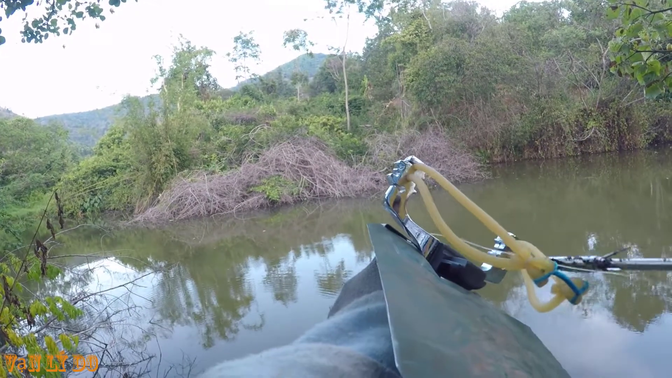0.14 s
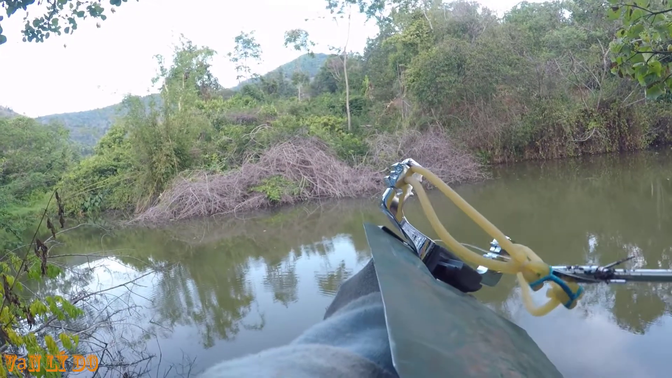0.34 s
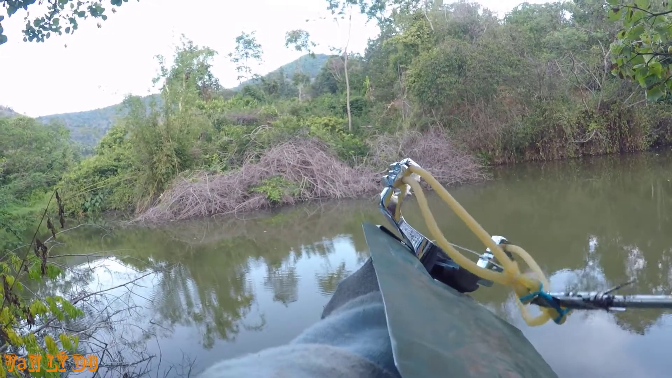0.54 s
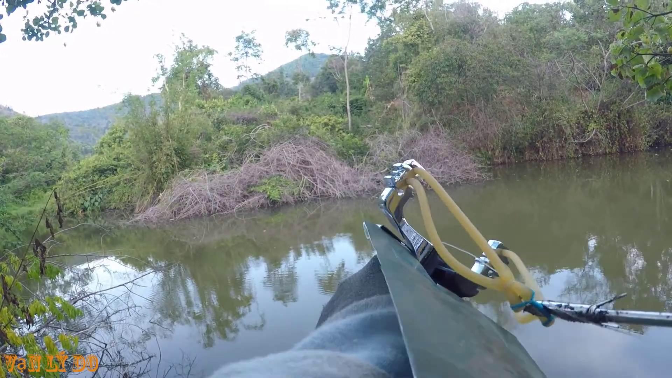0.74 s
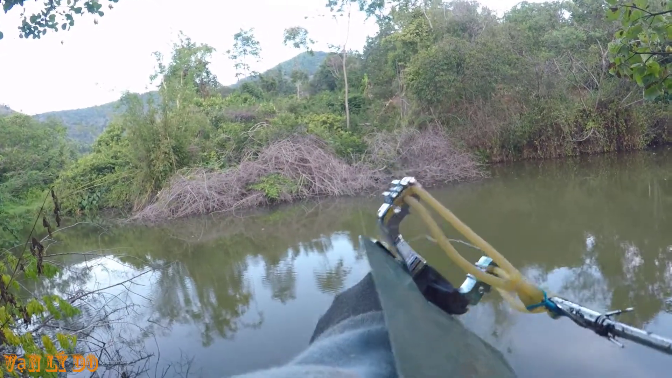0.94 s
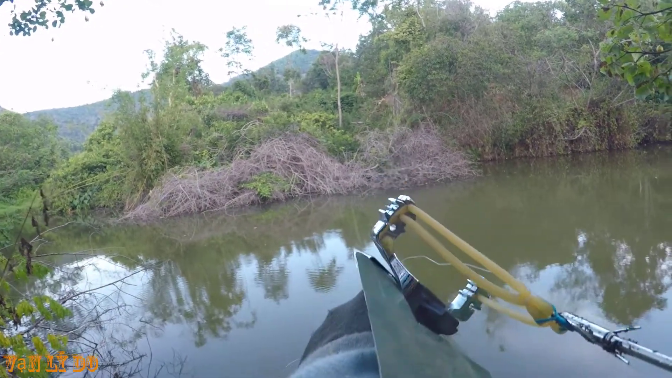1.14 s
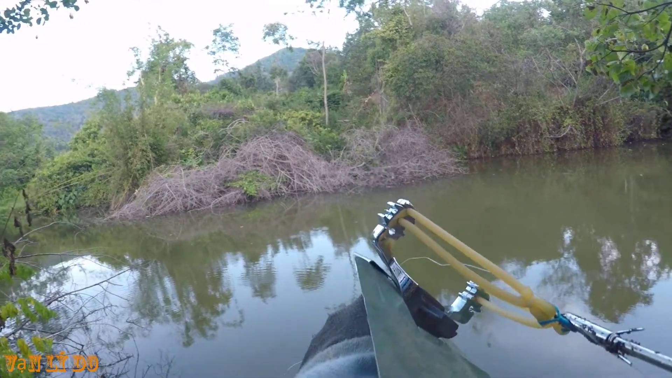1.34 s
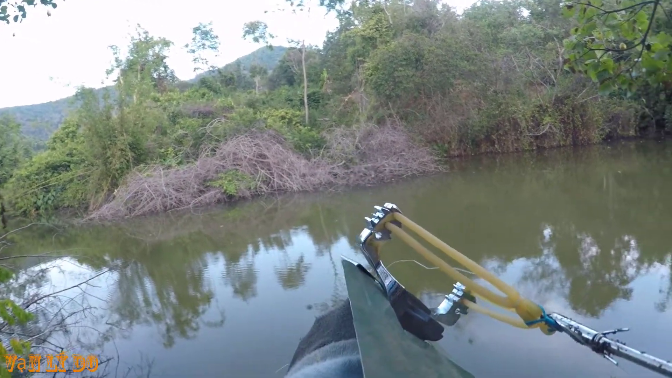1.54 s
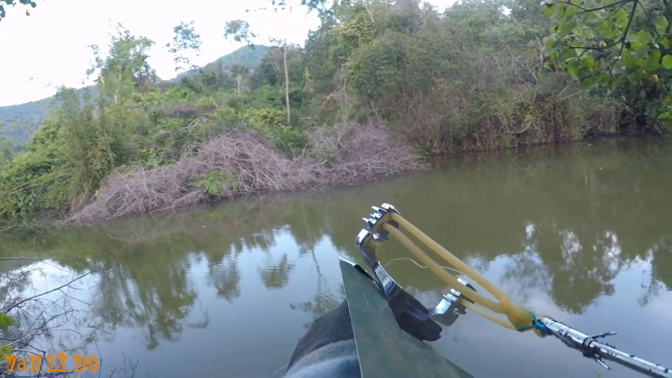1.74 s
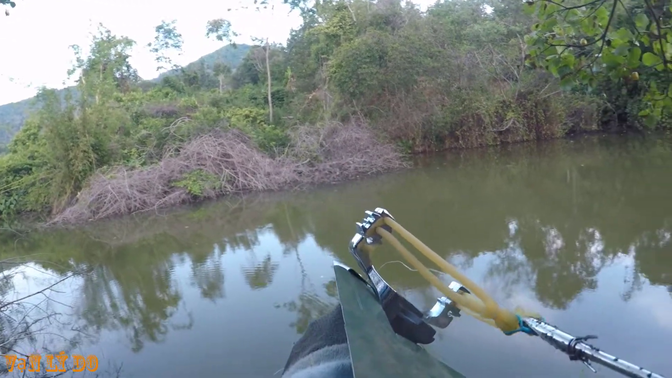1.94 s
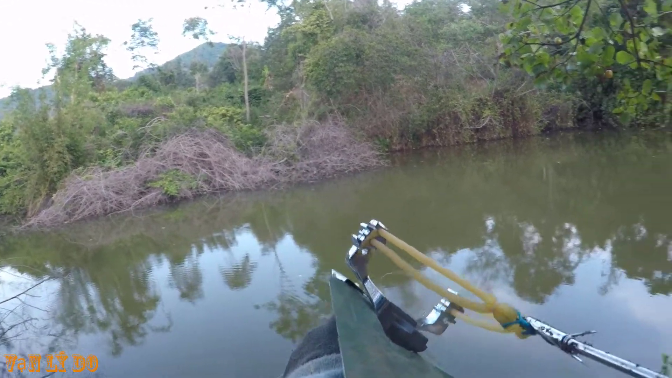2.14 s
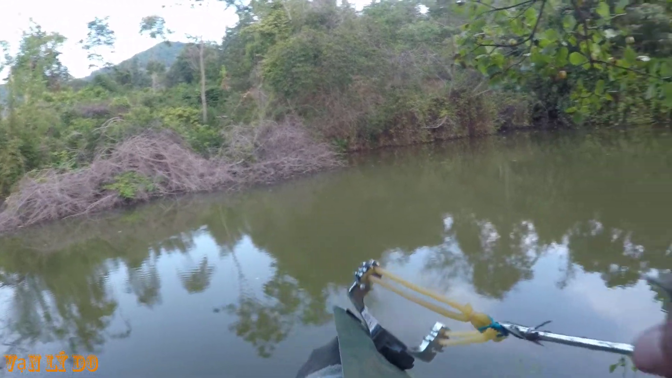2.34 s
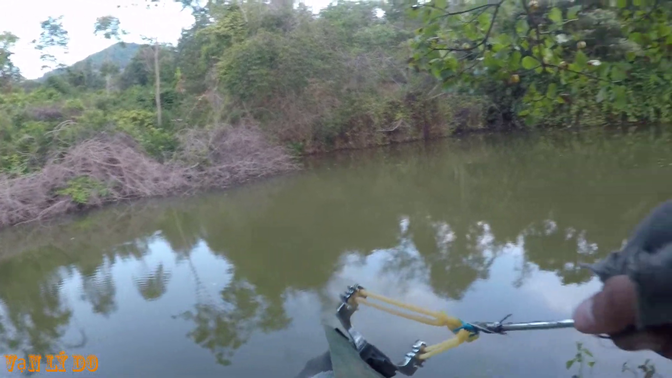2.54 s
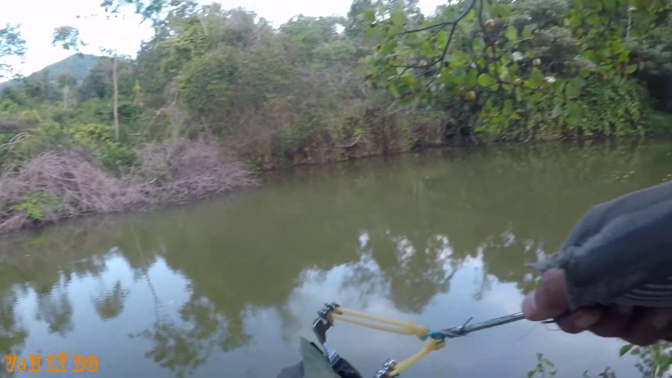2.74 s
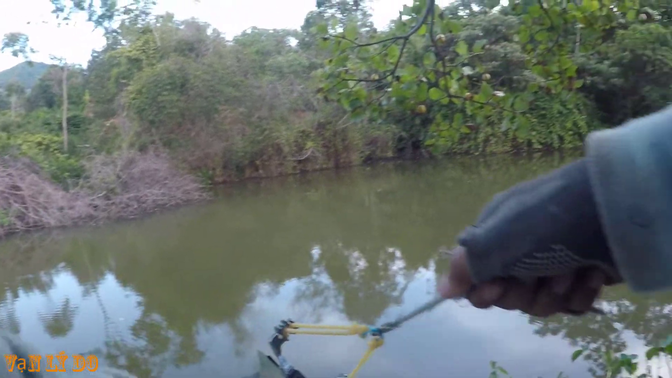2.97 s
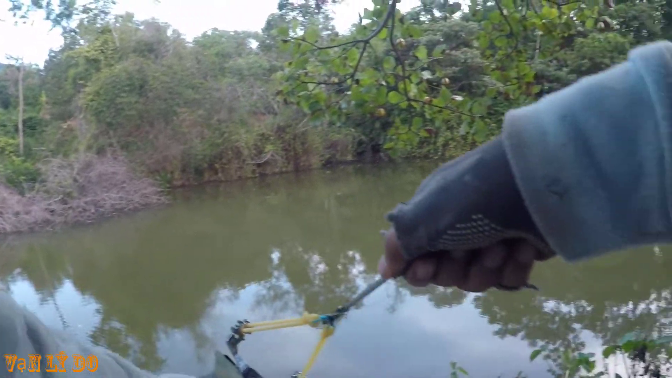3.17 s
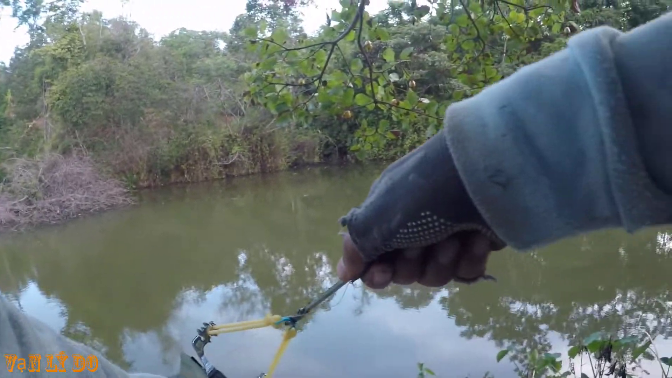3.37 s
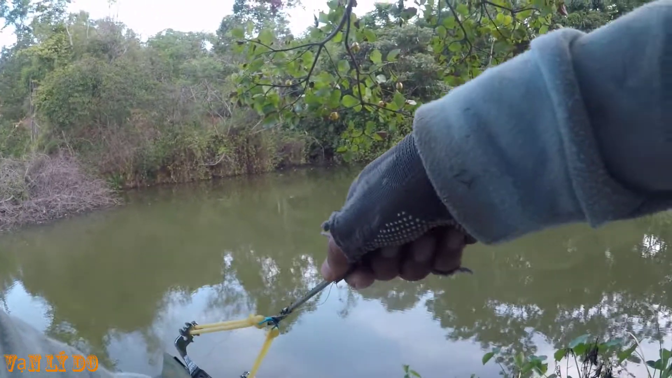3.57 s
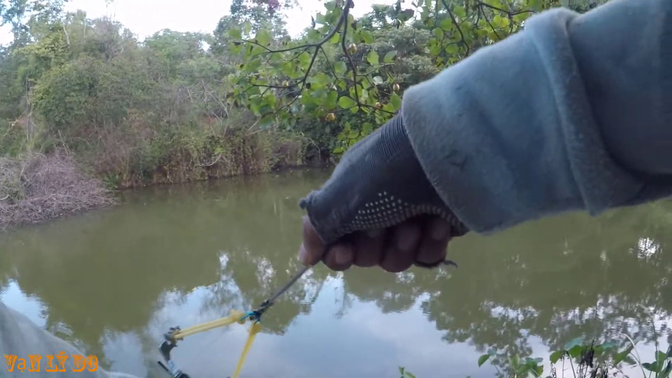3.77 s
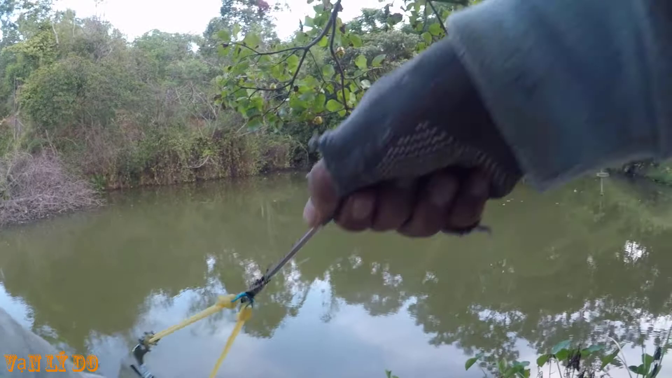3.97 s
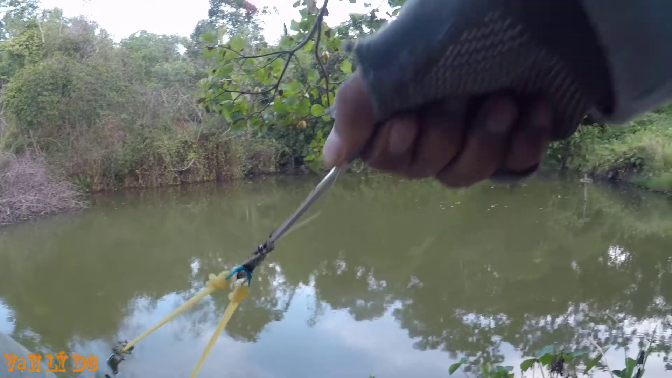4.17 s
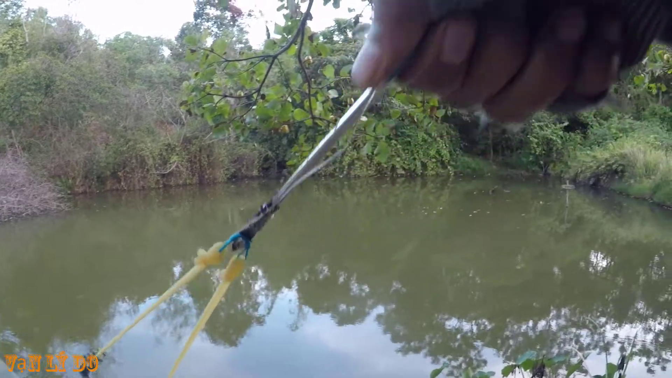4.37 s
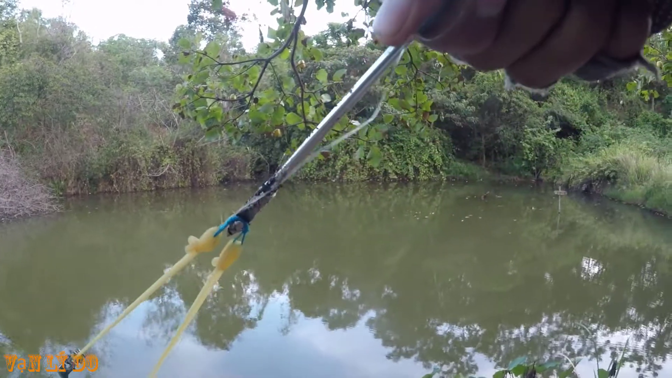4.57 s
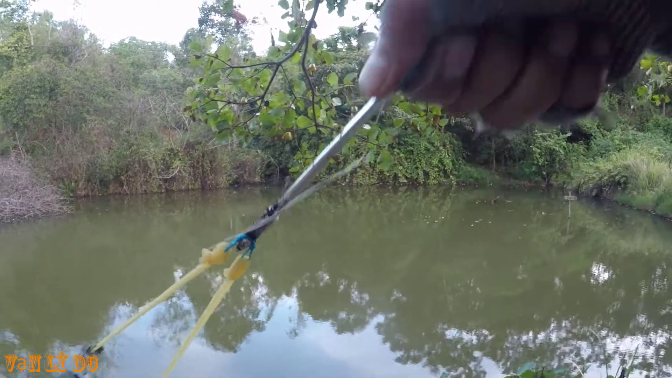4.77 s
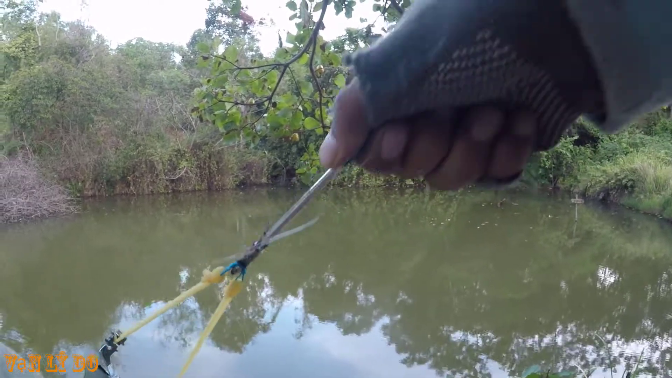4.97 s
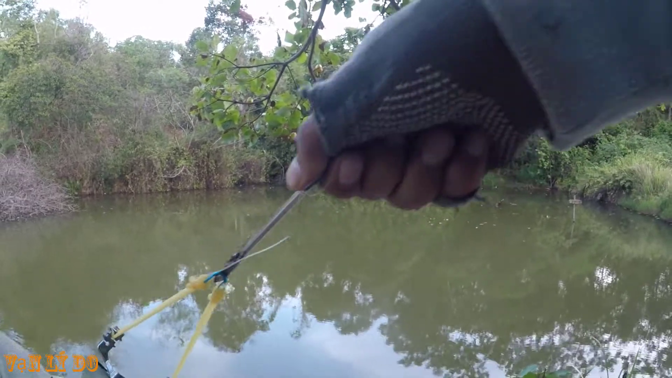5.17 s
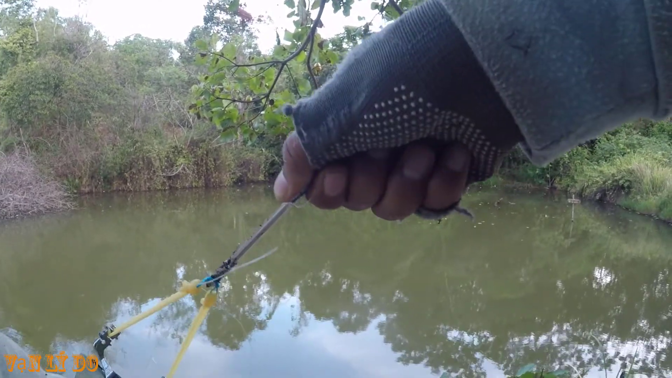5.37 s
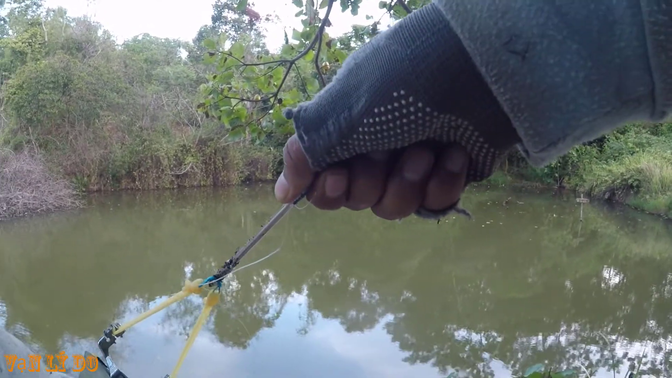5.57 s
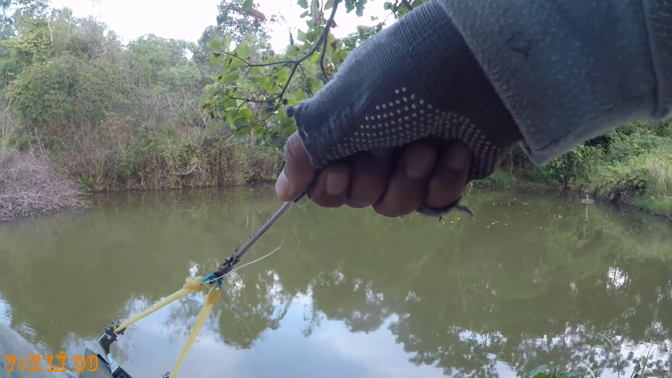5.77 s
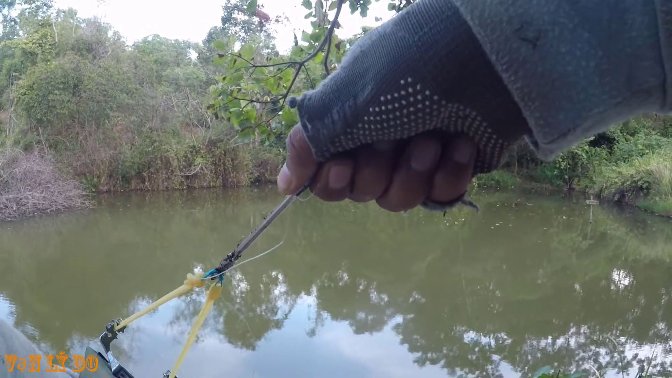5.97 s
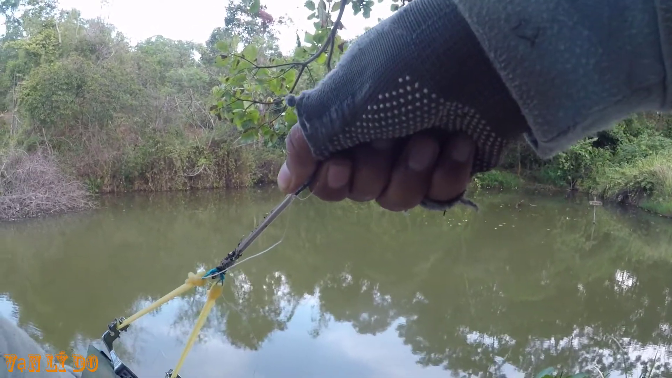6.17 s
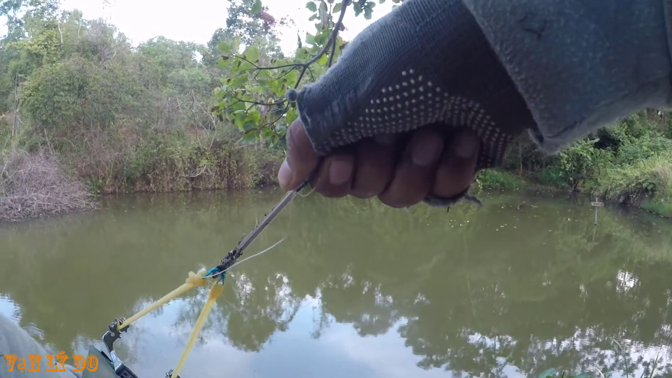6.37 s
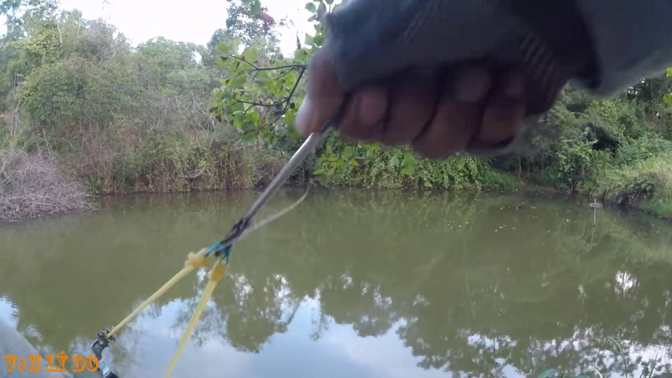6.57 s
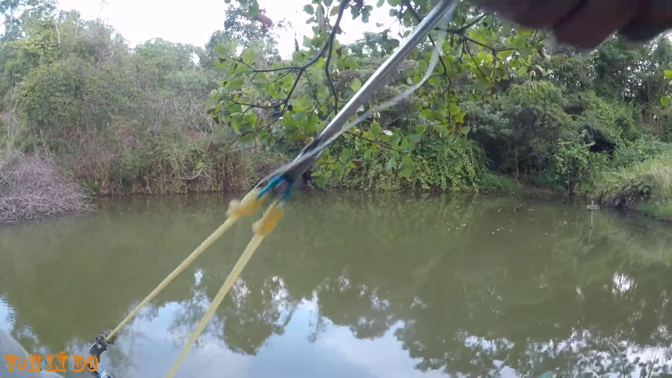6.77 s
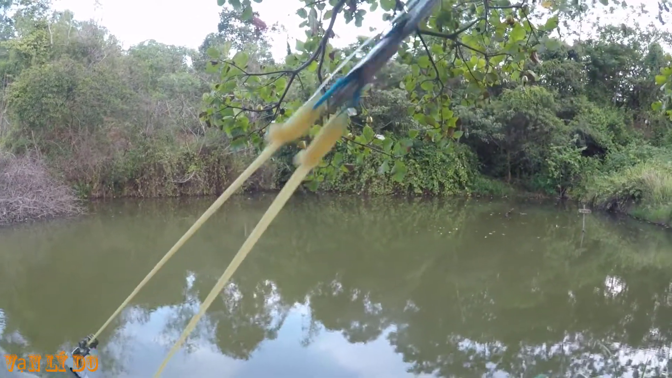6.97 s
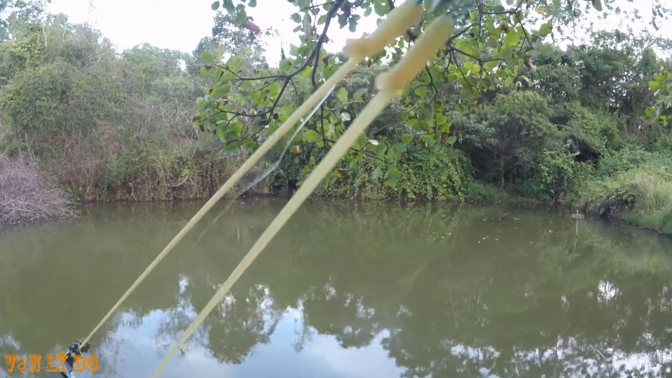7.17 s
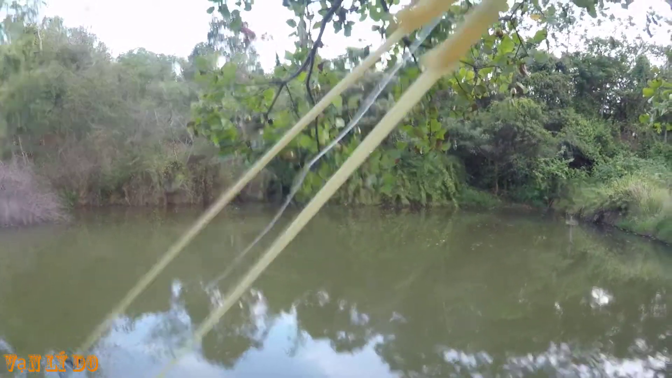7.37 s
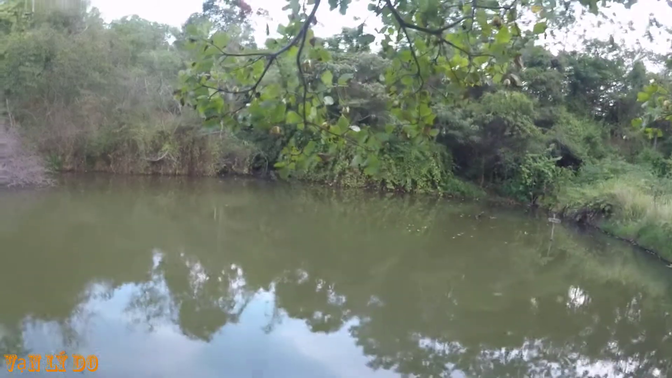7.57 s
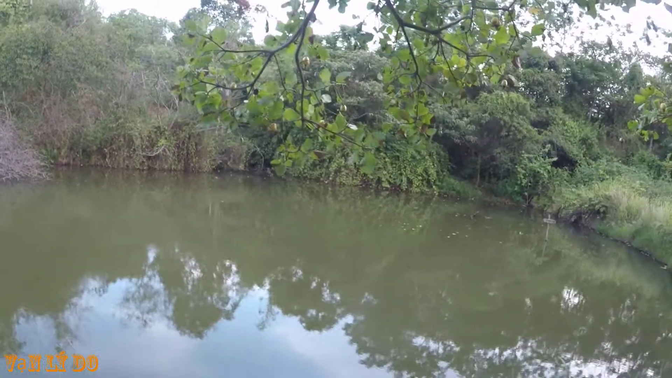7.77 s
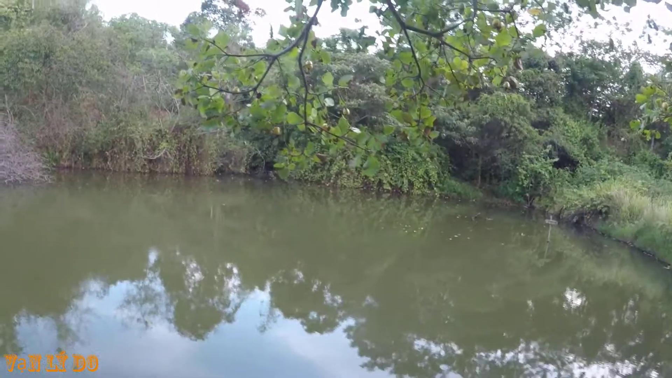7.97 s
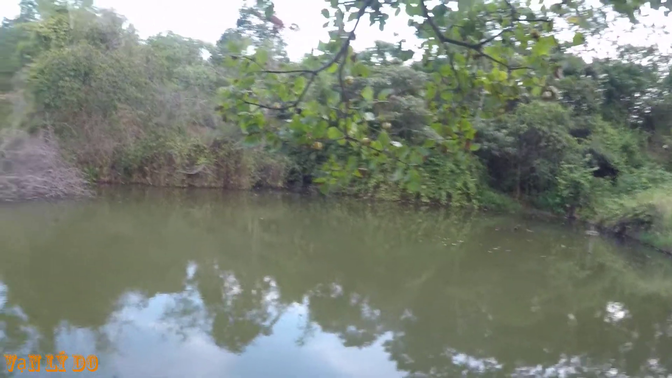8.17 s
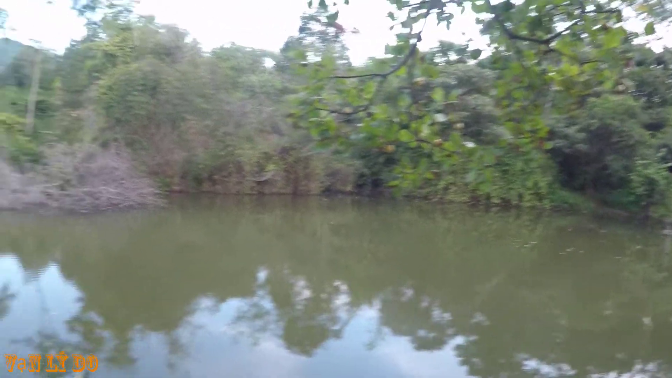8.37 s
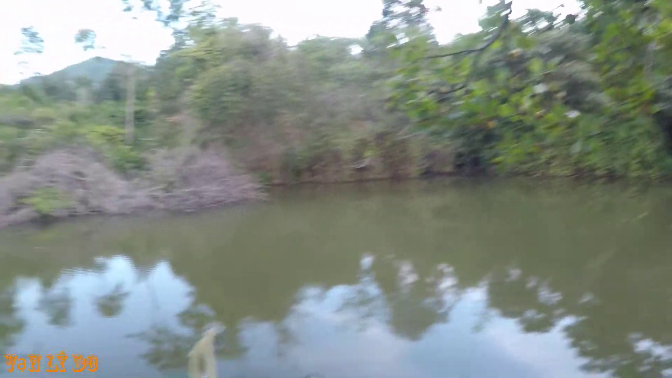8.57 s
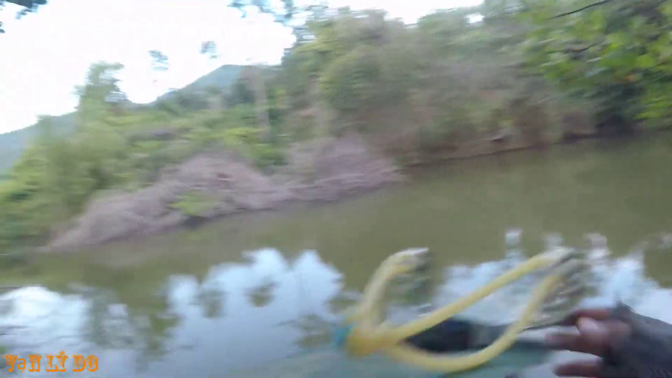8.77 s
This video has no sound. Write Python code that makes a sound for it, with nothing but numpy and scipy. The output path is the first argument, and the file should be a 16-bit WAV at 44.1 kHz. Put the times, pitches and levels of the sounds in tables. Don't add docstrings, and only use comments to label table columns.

```python
import sys
import numpy as np
from scipy import signal
from scipy.fft import rfft, irfft
from scipy.io import wavfile

SR = 44100
rng = np.random.default_rng(int(sys.argv[2]) if len(sys.argv) > 2 else 0)


def generate_wav(signal):
    frames = np.transpose(np.atleast_2d(signal))
    scaled = np.clip(frames, -1, 1) * 32767
    pcm = np.round(scaled).astype(np.int16)
    wavfile.write(sys.argv[1], SR, pcm)


def linear_from_db(decibels):
    return 10 ** (np.asarray(decibels, float) / 20)


N = 388521

# (frequency [Hz], level per Hz [dB])
RUMBLE_SPECTRUM = [(90, -45), (110, -42), (138, -4.5), (161, 0), (300, -7.5), (400, -13), (625, -16),
                   (960, -20.5), (1600, -24), (2400, -28.5), (3000, -35), (3500, -37), (4500, -35.5)]
# (time [s], gain on the rumble [dB])
SLEEVE_STIR = [
    (1.85, -1.5),
    (2.1, 1),
    (3.1, 0.3),
    (3.6, -0.5),
]
# (frequency [Hz], level per Hz [dB])
LEAF_SPECTRUM = [(2500, -54), (3600, -18), (4600, -3.5), (5500, -2), (6700, 2.5), (7800, -2), (9500, 2.5),
                 (11000, -4.5), (12400, -7.5), (14700, -11.5), (15800, -33)]
# (frequency [Hz], level per Hz [dB])
WIND_SPECTRUM = [(10, -5.5), (20, 5), (40, 0), (74, -1), (117, -7), (200, -18.5), (400, -22), (800, -33)]
# (time [s], level [dB])
BREEZE = [(0, -21.5), (.2, -29.5), (.86, -22.5), (1.4, -26), (2.11, -31.5), (2.5, -25), (2.7, -29.5),
          (3.3, -27), (3.45, -21.5), (3.8, -21), (4.3, -20), (5.05, -22), (5.2, -25.5), (5.72, -32),
          (6.43, -37), (6.94, -48), (7.3, -23.5), (8.81, -24)]
# (time [s], level [dB])
BODY_MOTION = [(7.25, -61), (7.41, -14), (7.63, -18), (7.75, -18.5), (8.4, -17), (8.51, -13.5), (8.56, -22),
               (8.66, -11.5), (8.81, -19)]
# (time [s], cricket gain [dB])
BODY_TURN = [(0, 0.5), (1.3, -0.5), (1.9, -3.5), (2.55, -6), (3.0, -11), (3.6, -8), (4.05, -12.5),
             (4.6, -11.5), (5.15, -12.5), (5.85, -8.5), (6.4, -13), (7.1, -15.5), (7.75, -10), (8.2, -8),
             (8.81, -4.5)]
# (time [s], upper pitch [Hz], lower pitch [Hz], upper louder by [dB])
NEAR_SONG = [(0, 5136, 5060, -3), (.45, 5204, 5090, 3), (.8, 5177, 5035, -2), (1.3, 5196, 5104, -4),
             (1.75, 5140, 5030, -1), (2.1, 5150, 4920, -1), (2.6, 5174, 5060, 3), (3.1, 5190, 5070, -1),
             (3.55, 5260, 5100, -5), (3.9, 5210, 5140, 2), (4.3, 5100, 5010, -8), (5.0, 5180, 5110, -8),
             (5.3, 5090, 4965, -3), (5.95, 5155, 5075, 1), (6.75, 5250, 5160, -6), (7.4, 5150, 5010, -2),
             (8.0, 5165, 5050, 1), (8.6, 5120, 4970, 1)]
# (start [s], end [s], start pitch [Hz], end pitch [Hz], level [dB])
FAR_PHRASES = [
    (0.25, 0.651, 4930, 4930, -43),
    (1.25, 1.648, 4900, 5000, -40),
    (1.905, 2.256, 4910, 4830, -45),
    (2.284, 2.75, 4900, 5030, -43),
    (3.041, 3.993, 4870, 5140, -46),
    (4.097, 5.099, 4910, 5030, -43.5),
    (5.1, 6.096, 4900, 5040, -44),
    (6.1, 6.597, 4980, 4920, -45.5),
    (7.05, 7.401, 4950, 4920, -49),
    (8.401, 8.81, 4900, 4950, -45),
]
# (time [s], peak level [dB], lowest [Hz], highest [Hz])
TICKS = [(2.21, -20, 800, 4500), (2.397, -20, 1490, 2600), (2.936, -22, 1400, 4500),
         (2.937, -24, 5300, 5900), (2.987, -22, 1400, 2967), (7.311, -23, 1510, 6500),
         (8.644, -21.5, 1200, 6500), (8.668, -20.5, 1200, 6500), (7.41, 0, 1500, 13980),
         (7.4385, -10, 1000, 12000), (7.503, -5, 800, 11000), (7.626, -7, 5000, 5940),
         (7.623, -14, 600, 4000), (7.628, -14, 1520, 12100), (7.689, -13, 500, 2200),
         (7.697, -20, 1500, 9000), (7.81, -23, 3530, 7000), (7.91, -27, 3800, 5000),
         (7.965, -31, 3770, 4780), (8.078, -20, 6970, 8260), (8.078, -23, 3000, 6000),
         (8.242, -34, 3500, 6000), (8.296, -36, 3500, 5900), (8.36, -22, 3600, 5100),
         (8.406, -20, 500, 2600), (8.454, -36, 3470, 6000), (8.723, -19, 1200, 2400),
         (8.485, -10.5, 1200, 9000), (8.776, -10.5, 1000, 7600)]
# (time [s], peak level [dB], pitch [Hz])
HAND_BUMPS = [(.748, -10, 248.4), (0.846, -16, 149), (1.2379, -7.5, 250), (1.659, -19, 178.4),
              (2.176, -7, 175), (2.197, -12.5, 177), (2.349, -20, 181.3), (3.373, -15, 300),
              (3.48, -20, 218), (3.98, -10, 191.8), (5.893, -16.5, 220.7), (7.092, -14, 198),
              (7.382, -7, 173), (7.5025, 5, 196), (7.57, -8, 162), (7.684, -3.5, 199), (7.688, -14.5, 550),
              (7.694, -19, 109.6), (8.385, -8, 203), (8.408, -10.5, 120.6), (8.481, 1, 421),
              (8.4858, 2.5, 250), (8.487, -7, 600), (8.641, -13, 111)]
# (time [s], peak level [dB], pitch [Hz])
ARM_THUMPS = [
    (8.497, 3, 72),
    (8.668, -4, 90),
    (8.721, 0.5, 75),
]
# (time [s], peak level [dB], pitch [Hz], t60 [s], direction [+1 or -1])
ARM_JOLTS = [
    (7.401, 6.5, 39, .05, 1),
    (7.427, 1, 34, 0.18, -1),
    (7.466, -1.5, 16, 0.57, 1),
    (7.52, 2.5, 15.7, 0.46, -1),
    (8.476, 9.5, 51, 0.071, -1),
]
# (time [s], low ring [dB], low ring pitch [Hz], high rings [dB], pitch struck best [Hz])
FRAME_KNOCKS = [
    (7.4145, 7, 870, -9, 5300),
    (7.4385, -1, 980, -5, 5850),
    (7.446, -2, 1000, -14, 4390),
    (7.4545, 0, 2050, -14, 5450),
    (7.462, -1, 1950, -14, 4390),
    (7.5015, -3, 950, -16, 5100),
    (7.623, 2, 900, -10, 5500),
    (8.776, -4, 800, -17, 4800),
    (8.807, -20, 900, -24, 4000),
]
# (pitch [Hz], level [dB], t60 [s])
FRAME_RINGS = [(4390, -1, .022), (5100, -1, .02), (5450, 0, .035), (5850, 0, .02), (6400, 0, .016)]
# (pitch [Hz], width [Hz], level [dB])
FORK_LOW_RINGS = [(849, 138, 10.5), (1030, 120, -13), (1320, 100, 2), (1815, 200, 3), (2030, 180, 4),
                  (2290, 123, -4), (2600, 170, 1.5)]
# (pitch [Hz], width [Hz], level [dB])
FORK_HIGH_RINGS = [(3980, 124, -3.5), (4260, 100, -4), (4500, 210, -5.5), (4660, 130, -7), (5220, 180, -3),
                   (5630, 97, -5), (5900, 120, -4), (6470, 160, -11.5)]
# (time [s], level [dB], t60 [s], low ring [dB])
LINE_RATTLE = [(7.416, -8, 0.12, -12), (7.446, -14.5, 0.17, -1.5), (7.455, -13, 0.13, -7.5),
               (7.464, -17, 0.19, -3), (7.476, -17, 0.27, -2), (7.556, -38, .13, 1), (7.570, -28.5, .1, 6),
               (7.579, -24, 0.087, 0.5), (7.605, -28, .34, -3), (7.685, -28.5, .065, -4),
               (8.626, -30.5, .13, 4.5), (8.638, -33, .08, -3), (8.658, -27, 0.083, -2),
               (8.666, -27, 0.058, 1), (8.69, -33, 0.2, -4), (8.718, -26.5, 0.036, 3)]
# (time [s], level [dB], t60 [s], low ring [dB], bright crack [dB])
BAND_SLAPS = [
    (7.385, -26, .03, 9, -12),
    (7.388, -19, 0.021, 11, -3),
    (7.391, -6.5, 0.0095, -10, 11),
    (7.398, -13, 0.13, -6, -12),
    (7.409, 3, 0.046, -1.5, -14),
    (7.437, -0.5, 0.068, 1, -30),
    (7.4998, -8.5, 0.031, 6.5, -22),
    (7.692, -22, 0.027, 8, -4),
    (8.477, -30, 0.046, 7, -25),
    (8.482, -26, 0.019, 14, -6),
]


def unit(x):
    return x / np.sqrt(np.mean(x ** 2) + 1e-20)


def in_time(rows):
    s, *columns = np.transpose(rows)
    return [np.interp(np.arange(N) / SR, s, column) for column in columns]


def drift(rate):
    r = np.exp(-80 * np.pi * rate / SR)
    noise = rng.standard_normal(N // 40 + 2002)
    slow = signal.lfilter([1], [1, -2 * r, r * r], noise)[2000:]
    return np.interp(np.arange(N) / 40, np.arange(len(slow)), unit(slow))


def coloured(spectrum, patchy_db, rate):
    hz = np.fft.rfftfreq(N + 1, 1 / SR) + 1
    points = np.array(spectrum)
    level_db = np.interp(np.log(hz), np.log(points[:, 0]), points[:, 1], left=-90, right=-90)
    shaped = rfft(rng.standard_normal(N + 1)) * linear_from_db(level_db)
    out, together = 0, drift(rate / 4)
    for octave in range(int(np.log2(points[0, 0])), int(np.log2(points[-1, 0])) + 2):
        share = np.clip(1 - abs(np.log2(hz) - octave), 0, 1)
        flicker = linear_from_db(patchy_db * (0.34 * together + drift(rate)))
        out = out + irfft(shaped * share, N + 1)[:N] * flicker
    return unit(out)


def add_ring(out, s, db, hz, t60, rise=0.):
    i = round(s * SR)
    t = np.arange(min(N - i, int(1.5 * t60 * SR))) / SR
    onset = 1 - np.exp(-t * hz / (rise + 1e-3))
    out[i:i + len(t)] += linear_from_db(db - 60 * t / t60) * np.sin(2 * np.pi * hz * t) * onset


def far_rumble(motion_db):
    keep = np.exp(-1 / (0.087 * SR))
    cloth = signal.lfilter([1 - keep], [1, -keep], linear_from_db(motion_db - 12))
    level = np.hypot(linear_from_db(-26 + in_time(SLEEVE_STIR)[0]), cloth)
    return level * coloured(RUMBLE_SPECTRUM, patchy_db=0.98, rate=6.0)


def leaf_hiss(shade_db):
    return linear_from_db(-38.5 - 0.16 * shade_db) * coloured(LEAF_SPECTRUM, patchy_db=.5, rate=5.7)


def wind(motion_db):
    level = np.hypot(linear_from_db(in_time(BREEZE)[0]), linear_from_db(motion_db))
    return level * coloured(WIND_SPECTRUM, patchy_db=-2.0, rate=6.6)


def chirr(pitch_hz, pulses_hz, depth, blur_hz):
    beat = np.cos(2 * np.pi * np.cumsum(pulses_hz * (1 + 0.0599 * drift(6.78))) / SR)
    phase = 2 * np.pi * np.cumsum(pitch_hz + 8 * drift(2.95)) / SR
    tone = (1.46 + drift(blur_hz)) * np.sin(phase) + drift(blur_hz) * np.cos(phase)
    return unit(tone * (1 + depth * beat))


def far_crickets():
    t = np.arange(N) / SR
    pitch_hz, gate = np.full(N, 5000.), np.zeros(N)
    for start, end, start_hz, end_hz, level_db in FAR_PHRASES:
        on = (t >= start) & (t < end)
        along = (t[on] - start) / (end - start)
        pitch_hz[on] = start_hz + (end_hz - start_hz) * along
        gate[on] = linear_from_db(level_db) * np.minimum(1, 6.0 * np.minimum(along, 1 - along))
    return gate * chirr(pitch_hz, pulses_hz=68.0, depth=0.84, blur_hz=30)


def near_crickets(shade_db):
    upper_hz, lower_hz, lead_db = in_time(NEAR_SONG)
    pair_db = -36.5 + shade_db
    upper = linear_from_db(pair_db + lead_db / 2) * chirr(upper_hz, pulses_hz=75, depth=0.28, blur_hz=30.6)
    lower = linear_from_db(pair_db - lead_db / 2) * chirr(lower_hz, pulses_hz=61.6, depth=0.19, blur_hz=30)
    middle_hz = (upper_hz + lower_hz) / 2
    between = linear_from_db(pair_db + 0.5) * chirr(middle_hz, pulses_hz=90, depth=1.0, blur_hz=45)
    return upper + lower + between


def ticks():
    out, t = np.zeros(N), np.arange(256) / SR
    for s, db, low_hz, high_hz in TICKS:
        grit = 0.18 * rng.standard_normal(len(t)) * np.exp(-t / 0.0013)
        contact = (t == 0) + grit
        band = signal.butter(3, [low_hz, high_hz], "band", fs=SR, output="sos")
        burst = signal.sosfilt(band, contact)
        out[round(s * SR):][:len(t)] += linear_from_db(db - 0.5) * burst / abs(burst).max()
    return out


def bumps_and_thumps():
    out = np.zeros(N)
    for table, cycles_to_60_db in (HAND_BUMPS, 8.7), (ARM_THUMPS, 3.2):
        for s, db, hz in table:
            add_ring(out, s, db + 3.5, hz, cycles_to_60_db / hz, rise=0.15)
    return out


def arm_jolts():
    push, pull = np.zeros(N), np.zeros(N)
    for s, db, hz, t60, direction in ARM_JOLTS:
        add_ring(push if direction > 0 else pull, s, db, hz, t60, rise=0.12)
    return push - pull


def frame_knocks():
    out = np.zeros(N)
    for s, low_db, low_hz, high_db, best_hz in FRAME_KNOCKS:
        contact_s = .0018 * linear_from_db(low_db)
        add_ring(out, s - .001, low_db + 6, low_hz, .021, rise=.5 + 900 * contact_s)
        for hz, db, t60 in FRAME_RINGS:
            off_spot_db = abs(hz - best_hz) / 150
            add_ring(out, s + contact_s, high_db + db - off_spot_db, hz, t60, rise=2.5)
    return out


def ring_fork(clicks, envelope, modes):
    out, plain = 0, 0
    for hz, width_hz, db in modes:
        r = np.exp(-np.pi * width_hz / SR)
        poles = [1, -2 * r * np.cos(2 * np.pi * hz / SR), r * r]
        struck = clicks * rng.standard_normal(len(clicks))
        pair = [struck * envelope + 1e-18, struck]
        rung = linear_from_db(db) * signal.lfilter([1 - r, 0, r - 1], poles, pair)
        out, plain = out + rung[0], plain + rung[1]
    return out / np.std(plain)


def slaps_and_rattle():
    first = round(7.3 * SR)
    t = np.arange(first, N) / SR
    low, high, crack = np.zeros((3, N - first))
    rattle = [(*row, -34) for row in LINE_RATTLE]
    for s, db, t60, low_db, crack_db in [*BAND_SLAPS, *rattle]:
        attack = np.clip((t - s) / 0.0018, 0, 1)
        fade = linear_from_db(db - 60 * np.maximum(t - s, 0) / t60) * attack
        low += fade * linear_from_db(low_db)
        high += fade
        crack += fade * linear_from_db(crack_db)
    clicks = linear_from_db(5.9 * np.minimum(rng.exponential(1, N - first), 5))
    clicks *= linear_from_db(drift(200)[first:])
    noise = rng.standard_normal((3, N - first)) * np.sqrt(clicks)
    thud = linear_from_db(-3.0) * low * unit(signal.lfilter([1], [1, -.9], noise[2]))
    treble = signal.butter(2, 6500, "high", fs=SR, output="sos")
    bright, bright_other = crack * unit(signal.sosfilt(treble, noise[:2]))
    low_rings = linear_from_db(-1.0) * ring_fork(clicks, low, FORK_LOW_RINGS)
    high_rings = ring_fork(clicks, high, FORK_HIGH_RINGS)
    mid = low_rings + thud + high_rings + bright
    return np.pad([mid, bright_other], ((0, 0), (first, 0)))


def scene():
    (motion_db,), (shade_db,) = in_time(BODY_MOTION), in_time(BODY_TURN)
    hiss, hiss_other = leaf_hiss(shade_db), leaf_hiss(shade_db)
    shot, shot_other = slaps_and_rattle()
    mid = far_rumble(motion_db) + hiss + wind(motion_db)
    mid += far_crickets() + near_crickets(shade_db)
    mid += ticks() + bumps_and_thumps() + arm_jolts() + frame_knocks() + shot
    side = linear_from_db(-2.5) * hiss_other + linear_from_db(-12) * shot_other + linear_from_db(-10) * shot
    treble = signal.ellip(5, .3, 40, (11300, 15400), "band", fs=SR, output="sos")
    side = signal.sosfiltfilt(treble, side)
    side += linear_from_db(-8) * shot_other
    return np.array([mid + side, mid - side])


def band_limit(x):
    return signal.sosfilt(signal.butter(12, 16220, fs=SR, output="sos"), x)


def record(dry):
    clipped = np.clip(dry, -.99, .99)
    low_pass = signal.cheby2(10, 40, 16350, fs=SR, output="sos")
    mix = signal.sosfilt(low_pass, clipped)
    return band_limit(mix)


dry = scene()
out = record(dry)
generate_wav(out)
```